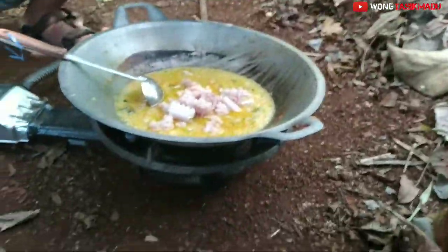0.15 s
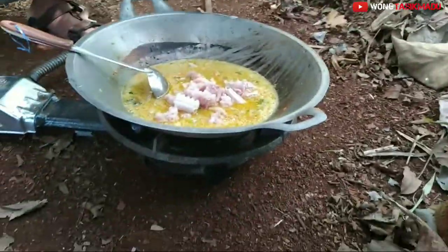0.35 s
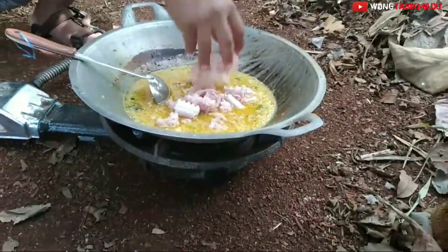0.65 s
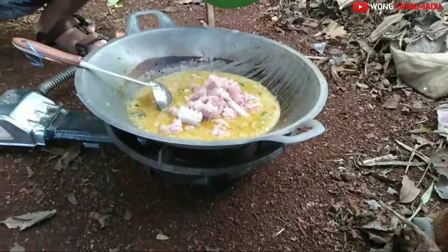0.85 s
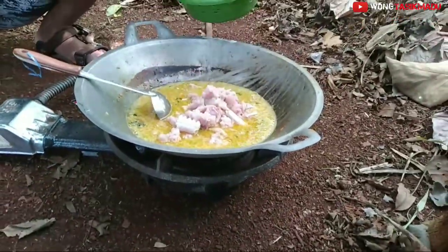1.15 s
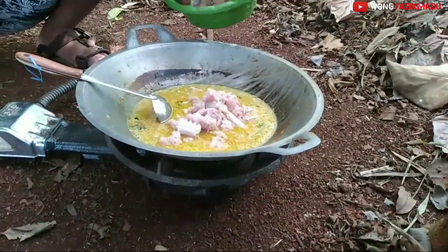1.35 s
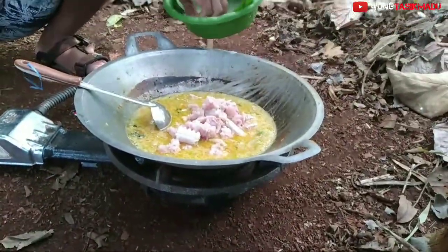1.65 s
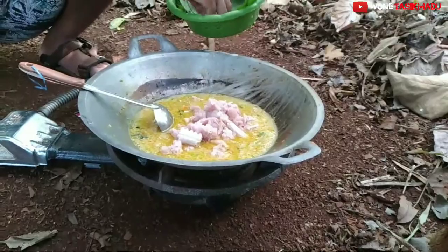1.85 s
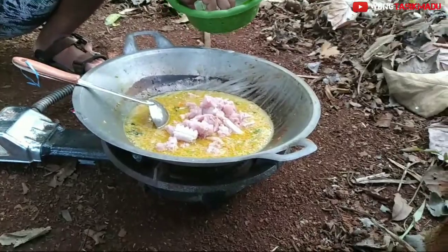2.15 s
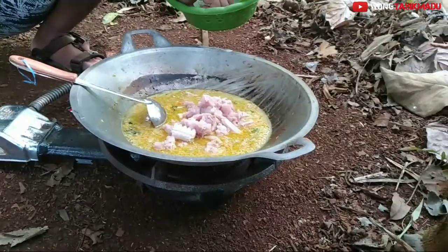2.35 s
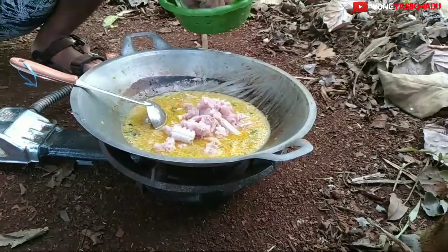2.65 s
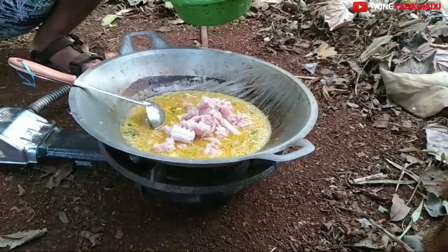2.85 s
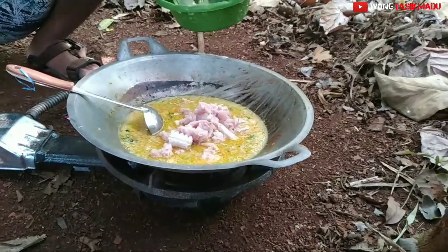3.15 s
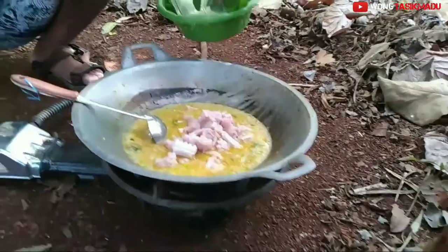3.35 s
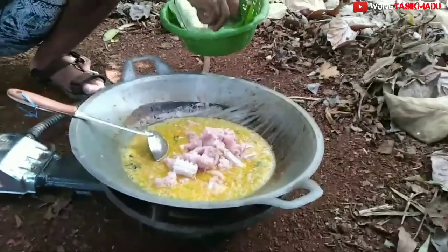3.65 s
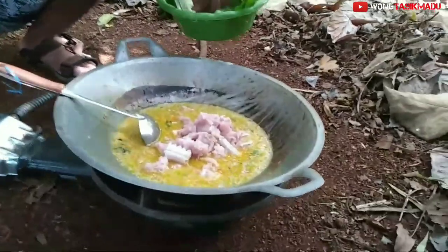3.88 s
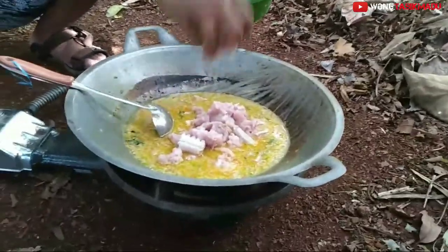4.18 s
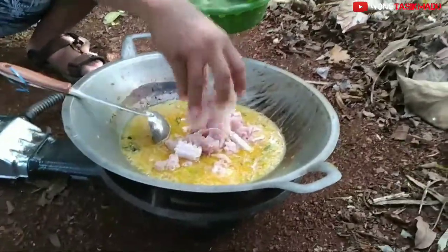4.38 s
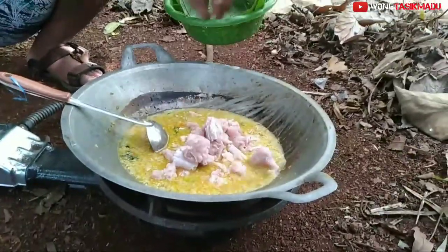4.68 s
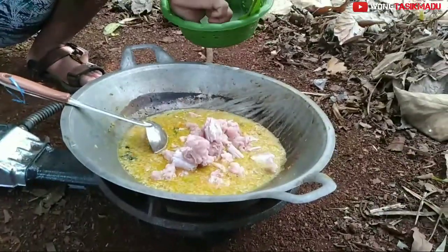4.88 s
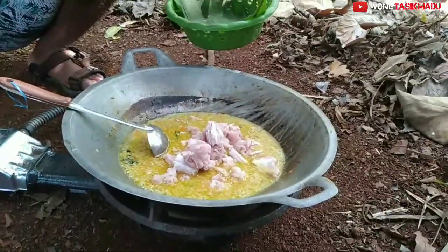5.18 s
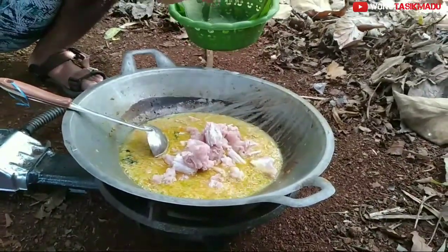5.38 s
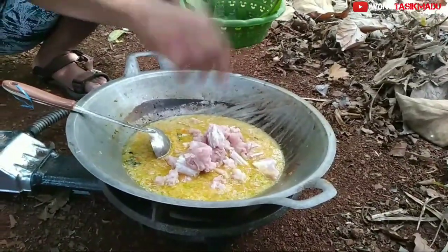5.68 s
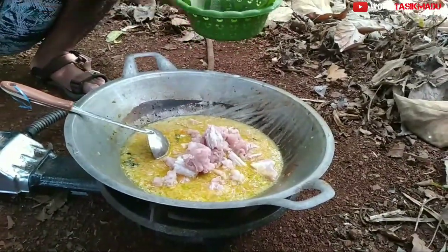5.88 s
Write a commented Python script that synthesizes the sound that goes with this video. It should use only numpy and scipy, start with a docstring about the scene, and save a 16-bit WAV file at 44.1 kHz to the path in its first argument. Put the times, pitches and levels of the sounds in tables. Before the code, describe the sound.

Close to a wok in the open air, broth and meat cook with a quiet, fine sizzle over the even rush of a gas flame. Hot fat snaps sharply early on, then scattered spits, thick bubble pops and a few soft bumps follow. The sizzling grows stronger about halfway through, sounding brighter on the right, with a low outdoor rumble underneath.

```python
"""A wok of broth and meat simmers outdoors on bare earth. From the start a gas burner hisses over low rumble
and a faint far drone, while tiny bubbles burst on the hot metal and ring in the open broth. Within the
first second droplets spit, soft thuds begin, broth surges up the wall, thick bubbles plop, fat snaps and
steam whistles briefly. The sizzle builds; after 4 s a deep hum comes and goes and steam whistles again.
Throughout, the right microphone port rings near 10 kHz."""
import sys
import numpy as np
from scipy import signal
from scipy.fft import rfft, irfft, next_fast_len
from scipy.io import wavfile

SR = 44100
rng = np.random.default_rng(int(sys.argv[2]) if len(sys.argv) > 2 else 0)


def inscribe(sig):
    """Save sig as 16-bit PCM at rate SR to the path in sys.argv[1].

    A 1-D sig is mono; a 2-D sig holds one channel per row.
    Samples are clipped to [-1, 1] before scaling.
    """
    pcm = np.round(np.clip(np.atleast_2d(sig).T, -1, 1) * 32767)
    wavfile.write(sys.argv[1], SR, pcm.astype(np.int16))


N = 265923
TIME = np.arange(N) / SR
PORT_LAG_S = .00032  # left behind right


def from_db(db):
    """Decibels to gain."""
    return 10 ** (np.asarray(db) / 20)


def unit_rms(x):
    """Scale to unit rms."""
    return x / np.sqrt(np.mean(x ** 2) + 1e-20)


def in_time(curve):
    """A time curve at every sample."""
    return np.interp(TIME, *np.transpose(curve))


def per_bin(curve, size):
    """A curve over log frequency at every FFT bin."""
    hz, value = np.transpose(curve)
    bin_hz = np.arange(size // 2 + 1) * SR / size
    return np.interp(np.log(bin_hz + 1), np.log(hz), value)


def coloured(x, spectrum):
    """Filter by a smooth spectrum."""
    size = next_fast_len(N + SR // 10)
    return irfft(rfft(x, size) * from_db(per_bin(spectrum, size)), size)[..., :N]


def drift(rate_hz):
    """Slow random wander, unit rms."""
    hop, settle = 40, 2000
    pole = np.exp(-2 * np.pi * rate_hz * hop / SR)
    noise = rng.standard_normal(N // hop + settle + 2)
    slow = signal.lfilter([1], [1, -2 * pole, pole * pole], noise)[settle:]
    return np.interp(np.arange(N) / hop, np.arange(len(slow)), unit_rms(slow))


def swells(rows, attack_s, release_s):
    """Gain of trapezoid swells, summed in power."""
    power = np.zeros(N)
    for start_s, length_s, level_db in rows:
        age_s = TIME - start_s
        shape = np.clip(np.minimum(age_s / attack_s, 1 - (age_s - length_s) / release_s), 0, 1)
        power += (from_db(level_db) * shape) ** 2
    return np.sqrt(power)


# Open air at two ports a hand apart: freq_hz, correlation
AIR_CORRELATION = [(30, .6), (70, .88), (170, .9), (450, .75), (750, .6), (1150, -.1), (1600, -.5),
                   (2200, -.05), (3300, .03), (15000, 0)]

def open_air(spectrum):
    """Stereo noise from all round: alike in the bass, unrelated in the treble."""
    size = next_fast_len(N)
    alike = np.clip(per_bin(AIR_CORRELATION, size), -1, 1)
    mid, side = rfft(rng.standard_normal((2, size)))
    ports = np.sqrt(1 + alike) * mid + np.sqrt(1 - alike) * side * np.array([[1], [-1]])
    return unit_rms(coloured(irfft(ports, size)[:, :N], spectrum))


# Flame and gas jet: freq_hz, gain_db
BURNER_SPECTRUM = [(120, -14), (250, -3.2), (330, -1.6), (450, -1.8), (650, 1.4), (900, .2), (1200, .6),
                   (1600, -1), (2400, 0), (3200, -1.7), (4200, -1.4), (6500, -.3), (9000, -4.2),
                   (15000, -11)]
# Burner as the microphone moves: time_s, level_db
BURNER_LEVEL = [(0, -58.3), (.45, -58.9), (.9, -57.7), (1.15, -55.8), (1.6, -57.3), (2.6, -57.5),
                (2.95, -56.5), (3.6, -56.3), (4.2, -57.5), (4.6, -59.7), (5.4, -57.6), (6, -58.8)]

def burner(flutter_db=.9, flutter_hz=10):
    """Steady rush of gas and flame, lightly fluttering."""
    return from_db(in_time(BURNER_LEVEL) + flutter_db * drift(flutter_hz)) * open_air(BURNER_SPECTRUM)


# Outdoor rumble: freq_hz, gain_db
RUMBLE_SPECTRUM = [(12, -1), (25, 1.5), (42, 0), (60, 1), (78, -1), (95, -.3), (140, -4.8), (220, -9.3),
                   (350, -18), (900, -40)]
# Its swells: time_s, level_db
RUMBLE_LEVEL = [(0, -61), (.45, -60.5), (1, -63.5), (1.9, -63), (2.3, -65), (3.6, -61.3), (4.8, -63),
                (5.4, -61.5), (6, -65)]

def rumble(gust_db=1.3, gust_hz=6):
    """Low outdoor noise, gently gusting."""
    return from_db(in_time(RUMBLE_LEVEL) + gust_db * drift(gust_hz)) * open_air(RUMBLE_SPECTRUM)


def wavering_tone(pitch_hz, waver_hz=1.8, waver_db=3.0):
    """A far tone, unsteady in pitch and level."""
    phase = 2 * np.pi * np.cumsum(pitch_hz + waver_hz * drift(5)) / SR
    return np.sqrt(2) * from_db(waver_db * drift(4)) * np.sin(phase)


# Far drone: time_s, level_db
DRONE_LEVEL = [(0, -88), (2.2, -81), (2.6, -75.5), (3.0, -74.5), (3.9, -73.5), (4.4, -81), (5.2, -76),
               (5.5, -78), (6, -73)]
# Its tones: pitch_hz, gain_db
DRONE_TONES = [(173, 0), (217, -3.5)]

def drone():
    """Two far tones swell together."""
    level_db = in_time(DRONE_LEVEL)
    return sum(from_db(level_db + db) * wavering_tone(hz, waver_hz=2.3) for hz, db in DRONE_TONES)


def bowl_path(scatter_db, scatter_t60_s, size=256):
    """One spot in the wok to both ports: direct click, right first, then scatter off the metal."""
    age_s = np.arange(size) / SR
    path = rng.standard_normal((2, size)) * from_db(-60 * age_s / scatter_t60_s)
    path *= from_db(scatter_db) / np.sqrt(np.sum(path ** 2, axis=1, keepdims=True))
    lag = int(np.clip(round(PORT_LAG_S * SR + rng.normal(0, 1)), 0, size - 1))
    path[0] = np.roll(path[0], lag)
    path[[0, 1], [lag, 0]] += 1  # direct click
    return path


def bursts(per_s, spread_db, scatter_db, scatter_t60_s, flare_db, flare_hz, spots=24):
    """Tiny uneven bubbles burst at the broth's edge; spots flare at random, each with its own colour."""
    sizes = from_db(spread_db * np.minimum(rng.exponential(1, N), 5)) * rng.choice([-1, 1], N)
    onsets = np.flatnonzero(rng.random(N) < per_s / SR)
    # busier spots draw more bursts
    odds = np.cumsum([from_db(flare_db * drift(flare_hz)[onsets]) for _ in range(spots)], axis=0)
    spot = np.argmax(odds >= rng.random(N)[onsets] * odds[-1], axis=0)
    paths = np.array([bowl_path(scatter_db, scatter_t60_s) for _ in range(spots)])
    samples = (onsets[:, None] + np.arange(paths.shape[-1])).ravel()
    clicks = (sizes[onsets, None] * paths[spot, port] for port in (0, 1))
    return np.array([np.bincount(samples, side.ravel(), N)[:N] for side in clicks])


def boil_off(steady, part):
    """Gain of "fizz" or "crackle": steady boil, surges and spits, summed in power."""
    column = ("fizz", "crackle").index(part)
    return np.sqrt(from_db(in_time(steady)) ** 2 + surges(column) ** 2 + spits(column) ** 2)


# Fine bursts: freq_hz, gain_db
FIZZ_SPECTRUM = [(4000, -30), (7000, -7), (8200, -.5), (10500, 0), (12500, -.5), (14000, -2.5), (15500, -4)]
# Steady fizz: time_s, level_db
FIZZ_LEVEL = [(0.0, -62), (0.57, -62.5), (0.75, -57), (1.07, -57.5), (1.26, -56), (1.9, -54), (2.77, -54),
              (2.97, -51), (3.36, -52), (3.54, -50), (4.01, -50), (4.37, -51), (4.59, -53.7), (4.8, -53.5),
              (5.17, -53), (5.36, -49), (5.71, -52.5), (6.03, -52.5)]

def fizz():
    """Broth boils off the hot wall in fine, bright bursts."""
    clicks = bursts(per_s=11000, spread_db=2.6, scatter_db=5, scatter_t60_s=.007, flare_db=8, flare_hz=6)
    return unit_rms(coloured(clicks, FIZZ_SPECTRUM)) * boil_off(FIZZ_LEVEL, "fizz")


def foam_colour(x, depth_db=1.6, rate_hz=10, low_hz=2200, high_hz=8000, bands=12):
    """Clusters of like-sized bubbles come and go, so each band swells on its own."""
    out = x.copy()
    edges_hz = np.geomspace(low_hz, high_hz, bands + 1)
    for band_hz in zip(edges_hz, edges_hz[1:]):
        band = signal.sosfilt(signal.butter(1, band_hz, "band", fs=SR, output="sos"), x)
        out += (from_db(depth_db * np.clip(drift(rate_hz), -2, 2)) - 1) * band
    return out


# Coarse bursts: freq_hz, gain_db
CRACKLE_SPECTRUM = [(700, -28), (1700, -19), (2400, -10), (3000, -5.2), (3700, -2.2), (5000, -2), (6200, 0),
                    (7500, .3), (9000, -8), (15000, -22)]
# Steady crackle: time_s, level_db
CRACKLE_LEVEL = [(0, -60), (.27, -59), (.5, -62), (.62, -57), (1.0, -59.5), (1.06, -55), (1.3, -54.5),
                 (1.9, -54.3), (2.75, -54), (3.02, -51.6), (3.22, -54), (3.36, -51), (3.58, -49.5),
                 (3.9, -52), (4.15, -50.5), (4.33, -55.5), (4.7, -57.3), (5.03, -54), (5.25, -54),
                 (5.43, -52), (5.7, -56), (5.87, -59.5), (6.03, -58.5)]

def crackle():
    """Coarser bursts on the hot wall, shifting in colour."""
    clicks = bursts(per_s=8000, spread_db=2.35, scatter_db=9, scatter_t60_s=.02,
                    flare_db=16, flare_hz=10)
    foam = foam_colour(coloured(clicks, CRACKLE_SPECTRUM))
    return unit_rms(foam) * boil_off(CRACKLE_LEVEL, "crackle")


# Fizz balance as the microphone moves: time_s, left_minus_right_db
FIZZ_PAN = [(0, 1.3), (.7, .8), (2.5, 2.2), (3.4, -1.8), (4, -1.8), (4.7, -4.5), (6, -5.8)]

def sizzle(clump_db=1.05, clump_hz=45):
    """Fizz and crackle clump and lull together; the crackle pans less."""
    pan_db = in_time(FIZZ_PAN)
    clumps = from_db(clump_db * drift(clump_hz) - lulls_db())
    fine = fizz() * from_db(pan_db * np.array([[.75], [-.25]]))
    coarse = crackle() * from_db(pan_db * np.array([[.3], [0]]))
    return clumps * (fine + coarse)


def wok_echo(x, delay_s=.0017, gain=.22, sway_s=.0001):
    """The bowl's far wall returns a close echo; its comb shifts as the microphone sways."""
    echo = [np.interp(TIME - delay_s - sway_s * drift(.7), TIME, channel) for channel in x]
    return x + gain * np.array(echo)


def simmer(base_db=-58, spread_db=3.5, follow=.8, low_hz=2400, high_hz=7000, t60_cycles=110, count=450):
    """Bubbles in the open broth ring, smaller ones higher and louder; level follows the steady crackle."""
    out, age_s = np.zeros((2, N)), TIME[:SR // 12]
    for when, smallness, loudness, across in rng.random((count, 4)):
        pitch_hz = low_hz * (high_hz / low_hz) ** smallness
        phase = 2 * np.pi * pitch_hz * (age_s - np.array([[PORT_LAG_S * 2 * across], [0]]))
        ring = np.sin(phase) * from_db(-60 * age_s * pitch_hz / t60_cycles)
        gain = from_db(base_db + spread_db * (2 * loudness - 1)) * np.sqrt(pitch_hz / low_hz)
        at = int(when * N)
        out[:, at:at + len(age_s)] += gain * ring[:, :N - at]
    boil_db = in_time(CRACKLE_LEVEL)
    return out * from_db(follow * (boil_db - boil_db.mean()))


# Droplets: peak_s, fizz_db, crackle_db, t60_s
SPITS = [(.247, -56, -59, .2), (.596, -54.5, -58, .05), (.672, -54.5, -59, .06), (.712, -53, -57, .06),
         (.73, -53, -58, .1), (.836, -53, -57, .12), (1.056, -46.5, -53, .09), (1.228, -54.5, -53, .12),
         (1.433, -48, -51, .12), (1.626, -51, -53.5, .12), (1.764, -54, -53, .06), (1.795, -50.5, -58, .14),
         (1.877, -54, -58, .12), (2.045, -46.5, -52, .12), (2.234, -46.5, -50, .18),
         (2.336, -48.5, -54, .12), (2.41, -51, -64, .08), (3.035, -48.5, -52, .1), (3.212, -50, -57, .09),
         (3.432, -48, -53, .25), (3.466, -46.3, -46.3, .2), (3.498, -49.5, -52, .06),
         (3.708, -41, -46, .17), (3.76, -47, -51, .08), (4.022, -43.3, -47, .26), (4.358, -48.5, -53, .12),
         (4.688, -52.5, -62, .08), (4.805, -47.5, -54, .07), (4.89, -50, -55, .12), (5.075, -49.5, -55, .1),
         (5.159, -40, -49, .15), (5.595, -50, -56, .08), (5.635, -53, -58, .08)]

def spits(column, attack_s=.016):
    """Sizzle gain as droplets flash to steam: quick flare, quick decay."""
    gain = np.zeros(N)
    for peak_s, *levels_db, t60_s in SPITS:
        age_s = TIME - peak_s
        rise = np.clip(1 + age_s / attack_s, 0, 1)
        gain += rise * from_db(levels_db[column] - 60 * np.clip(age_s / t60_s, 0, 2))
    return gain


# Dry moments: centre_s, depth_db
LULLS = [(.45, 4), (.96, 2), (1.94, 3.5), (2.39, 2), (2.67, 2), (3.27, 8), (3.65, 3), (4.3, 2), (4.66, 3),
         (4.72, 3.3), (4.85, 2), (5.12, 6), (5.675, 3), (5.83, 2)]

def lulls_db(width_s=.03):
    """Sizzle attenuation as the wall briefly dries."""
    return sum(depth_db * np.exp(-((TIME - centre_s) / width_s) ** 2) for centre_s, depth_db in LULLS)


# Soft bumps: start_s, level_db, pitch_hz, t60_s
THUDS = [(.47, -58, 90, .3), (1.97, -57, 88, .35), (2.584, -52, 135, .05), (3.51, -54, 88, .25),
         (4.099, -42, 125, .035)]

def thuds():
    """Each push rings out as a low damped sine, alike at both ports."""
    out = np.zeros(N)
    for start_s, level_db, pitch_hz, t60_s in THUDS:
        age_s = np.clip(TIME - start_s, 0, 2 * t60_s)
        out += from_db(level_db - 60 * age_s / t60_s) * np.sin(2 * np.pi * pitch_hz * age_s)
    return out


# Washes of broth: start_s, length_s, fizz_db, crackle_db
SURGES = [(.55, .11, -60.5, -66), (.79, .06, -55.5, -61), (1.14, .13, -54, -58), (1.32, .09, -57, -62),
          (1.46, .04, -56, -58), (1.75, .08, -54, -61), (1.97, .07, -55.5, -60), (2.1, .05, -54, -58),
          (2.2, .07, -51.5, -56), (2.44, .1, -55.5, -59), (2.73, .1, -53.5, -61), (2.87, .2, -51.5, -57),
          (3.13, .06, -52.5, -59), (3.305, .06, -52, -51), (3.405, .085, -45, -47.5),
          (3.555, .05, -53.5, -52), (3.77, .22, -54, -59), (4.11, .08, -49, -53), (4.34, .21, -53.5, -59),
          (4.76, .04, -53.5, -58), (4.87, .08, -54.5, -60), (5.14, .19, -50.5, -59), (5.36, .14, -49, -52),
          (5.53, .1, -53.5, -59), (5.7, .07, -53.5, -58), (5.88, .15, -54, -64)]

def surges(column):
    """Sizzle gain as broth washes onto hotter metal and boils away."""
    rows = [(start_s, length_s, levels_db[column]) for start_s, length_s, *levels_db in SURGES]
    return swells(rows, attack_s=.03, release_s=.035)


def pops(rows, t60_s, width, alike):
    """Fast-dying noise puffs, each through a broad resonance."""
    out, age_s = np.zeros((2, N)), TIME[:SR // 4]
    for start_s, peak_db, pitch_hz in rows:
        band_hz = [pitch_hz / (1 + width), pitch_hz * (1 + width)]
        band = signal.butter(1, band_hz, "band", fs=SR, output="sos")
        mid, side = rng.standard_normal((2, len(age_s))) * from_db(-60 * age_s / t60_s)
        side *= 1 - alike
        puff = signal.sosfilt(np.vstack([band, band]), [mid + side, mid - side])
        puff *= from_db(peak_db) / np.abs(puff).max()
        at = round(start_s * SR)
        out[:, at:at + len(age_s)] += puff[:, :N - at]
    return out


# Thick bubbles: start_s, peak_db, pitch_hz
PLOPS = [(.58, -54, 1300), (1.79, -49.3, 680), (2.891, -55.5, 620), (3.207, -53, 1170),
         (4.227, -53.5, 1000), (4.808, -49.3, 720), (5.718, -51, 720)]

def plops():
    """Thick bubbles in the broth open with a dull pop."""
    return pops(PLOPS, t60_s=.07, width=.45, alike=.6)


# Hot fat: start_s, peak_db, pitch_hz
FAT_SNAPS = [(.7165, -25, 7200), (.7175, -33, 4100), (.7195, -33, 7500), (.7197, -42, 3000),
             (.7218, -43.5, 2600), (.7275, -39, 6000), (1.4344, -36, 6400), (1.4845, -33, 6250),
             (1.4964, -38, 5020), (1.6325, -37, 5600), (3.211, -39, 4500), (4.6364, -38, 4280)]

def fat_snaps():
    """Fat snaps in short, sharp pops."""
    return pops(FAT_SNAPS, t60_s=.008, width=.3, alike=.1)


# Escaping steam: centre_s, peak_db, pitch_hz
STEAM_WHISTLES = [(.722, -56, 4350), (4.806, -50, 9750)]

def steam_whistles(width_s=.014, jitter_hz=130):
    """Steam squeezes from under the meat in brief, breathy tones."""
    out = np.zeros((2, N))
    port_time_s = TIME - np.array([[PORT_LAG_S], [0]])
    for centre_s, peak_db, pitch_hz in STEAM_WHISTLES:
        phase = 2 * np.pi * (pitch_hz * port_time_s + np.cumsum(jitter_hz * drift(150)) / SR)
        out += from_db(peak_db) * np.exp(-((TIME - centre_s) / width_s) ** 2) * np.sin(phase)
    return out


# Deep hum: start_s, length_s, level_db
HUM_SWELLS = [(4.37, .22, -59.5), (4.66, .12, -63), (4.95, .38, -61.5), (5.46, .12, -63)]

def hum():
    """A deep, wavering tone comes and goes."""
    return swells(HUM_SWELLS, attack_s=.08, release_s=.08) * wavering_tone(pitch_hz=62.5)


def scene():
    """Burner, open air and wok; only the sizzle echoes in the bowl."""
    steady = burner() + rumble() + drone() + wok_echo(sizzle()) + simmer()
    return steady + thuds() + plops() + fat_snaps() + steam_whistles() + hum()


# Left port response: freq_hz, gain_db
LEFT_PORT = [(2400, 0), (3100, 1.3), (3750, 2.3), (4500, -.3), (5150, -1.6), (5900, 0), (7000, .4),
             (8500, -1), (9500, -1.6), (10600, .3), (12500, .3), (14500, .2)]
# Right port response: freq_hz, gain_db
RIGHT_PORT = [(900, -.4), (1800, 1.3), (2400, 1.3), (3600, -.1), (4800, .9), (6000, -.3), (7000, -.7),
              (8000, 1), (9300, 8.6), (9750, 13.4), (10050, 12.6), (10680, 14.4), (11400, 10.8),
              (12100, 11.3), (13300, 8.3), (15500, 3.7)]

def record(dry, cutoff_hz=15450):
    """Each port colours the sound, the right ringing near 10 kHz; a steep low-pass follows."""
    ports = np.array([coloured(dry[0], LEFT_PORT), coloured(dry[1], RIGHT_PORT)])
    return signal.sosfilt(signal.ellip(12, .1, 80, cutoff_hz, fs=SR, output="sos"), ports)


dry = scene()
out = record(dry)
inscribe(out)
```